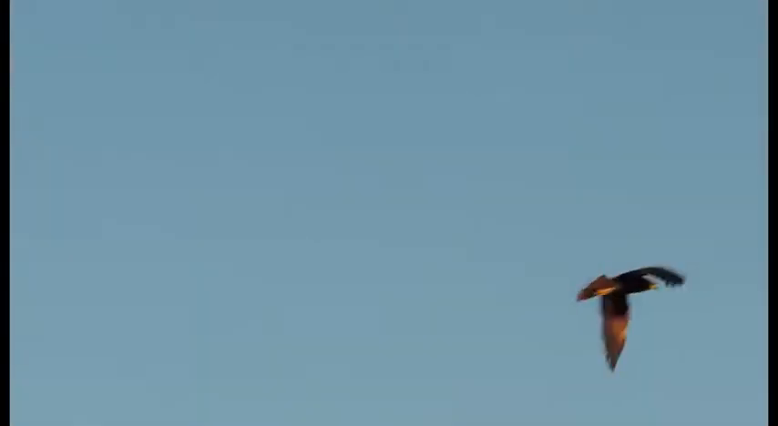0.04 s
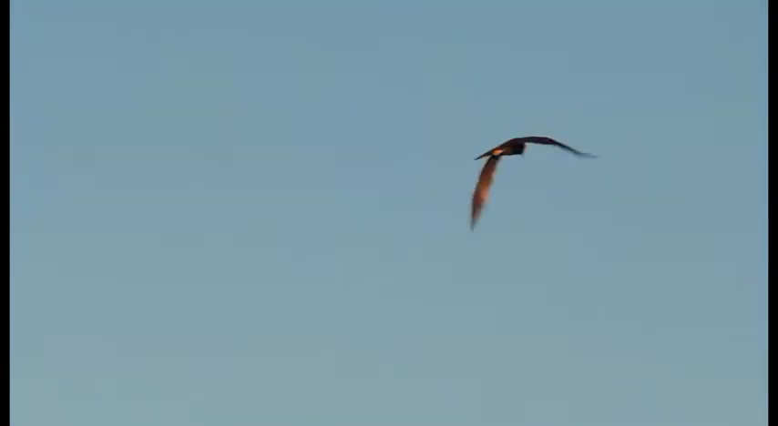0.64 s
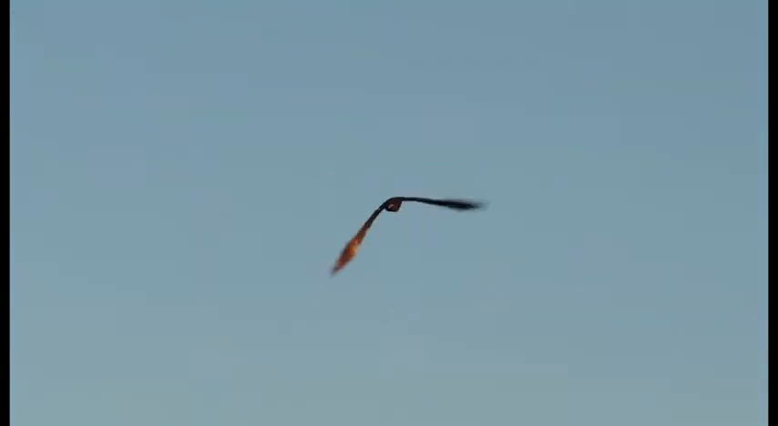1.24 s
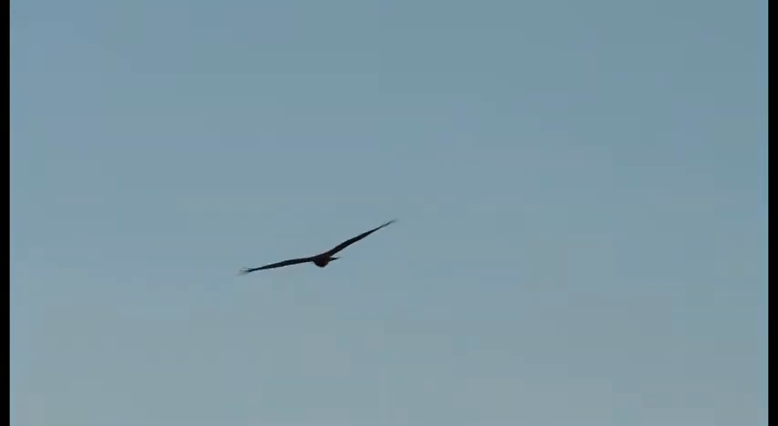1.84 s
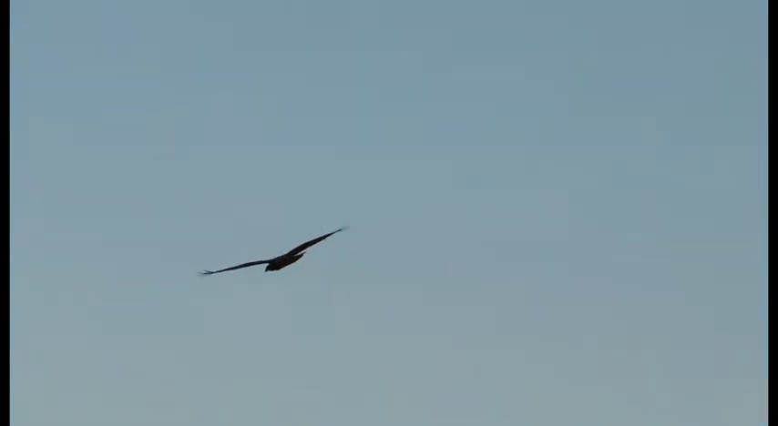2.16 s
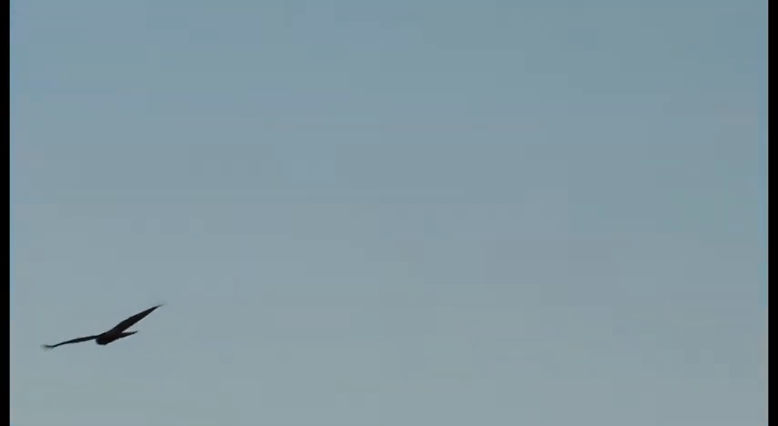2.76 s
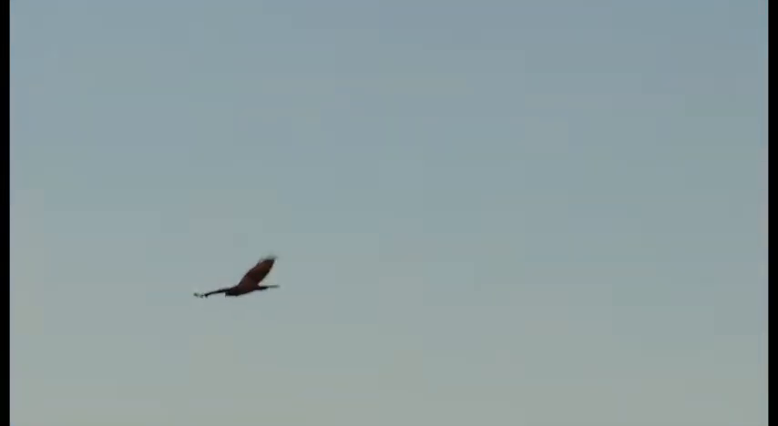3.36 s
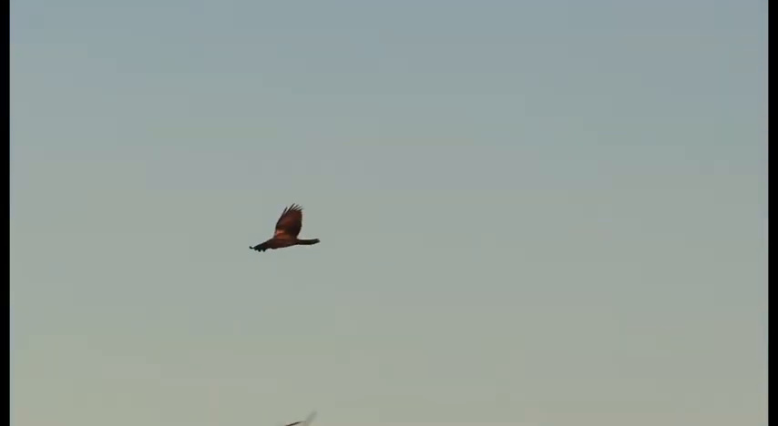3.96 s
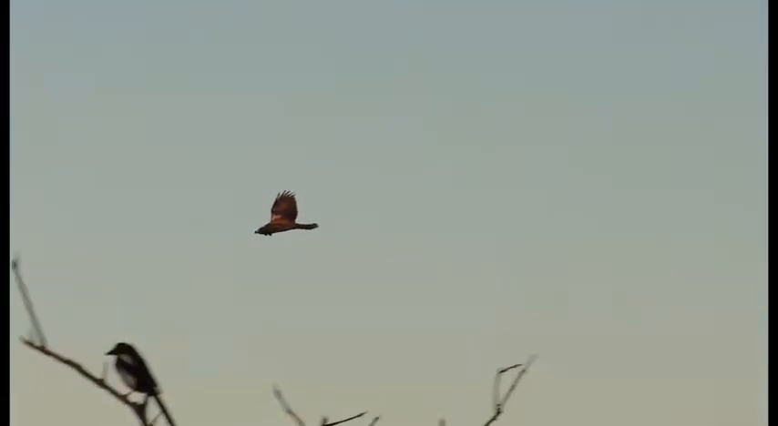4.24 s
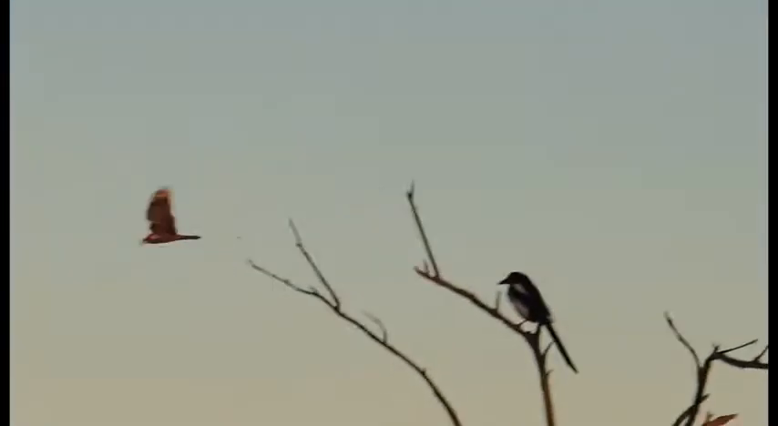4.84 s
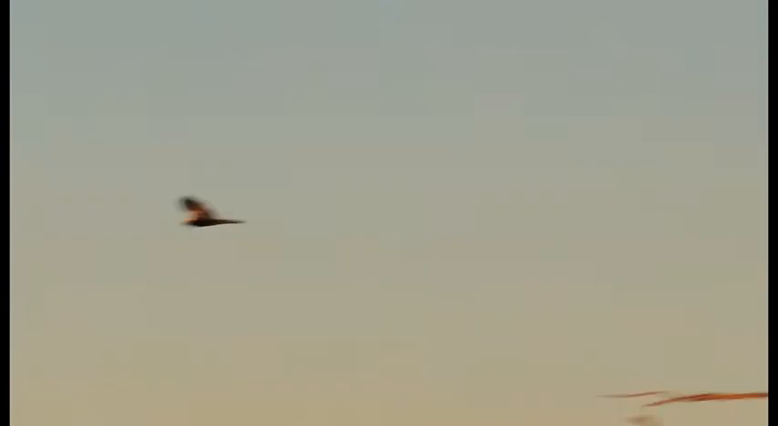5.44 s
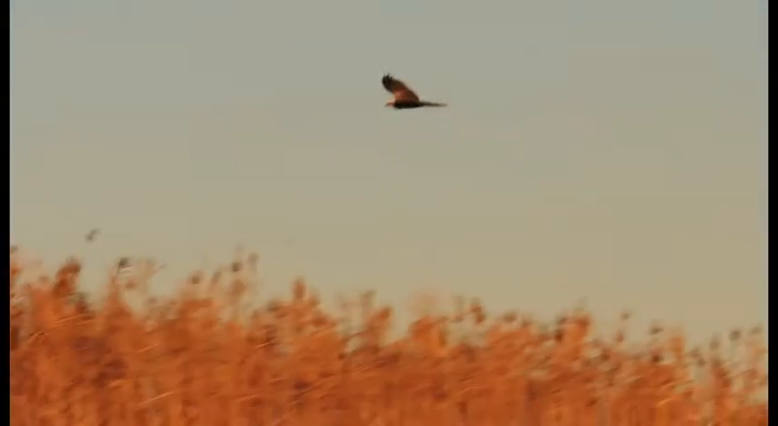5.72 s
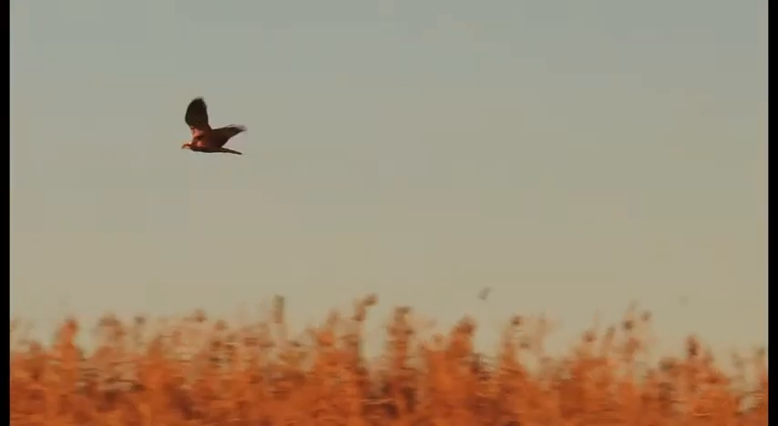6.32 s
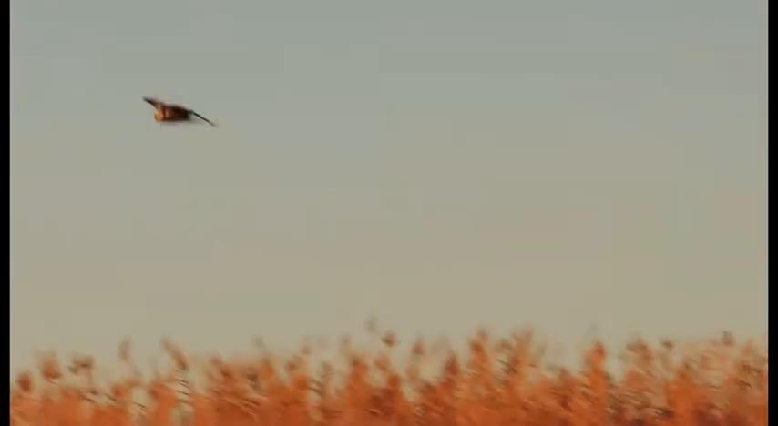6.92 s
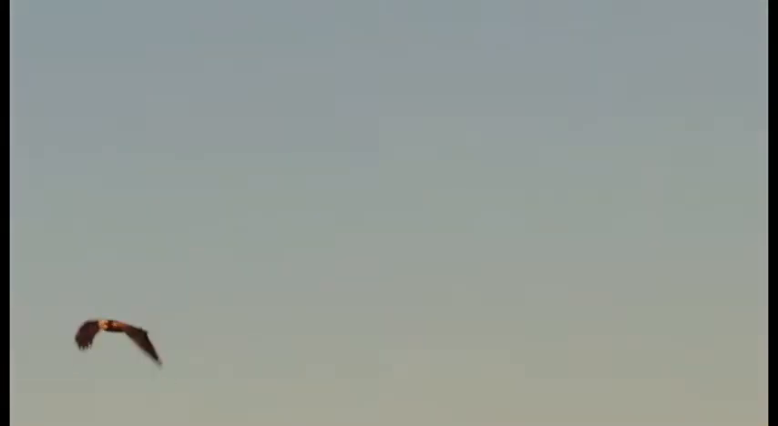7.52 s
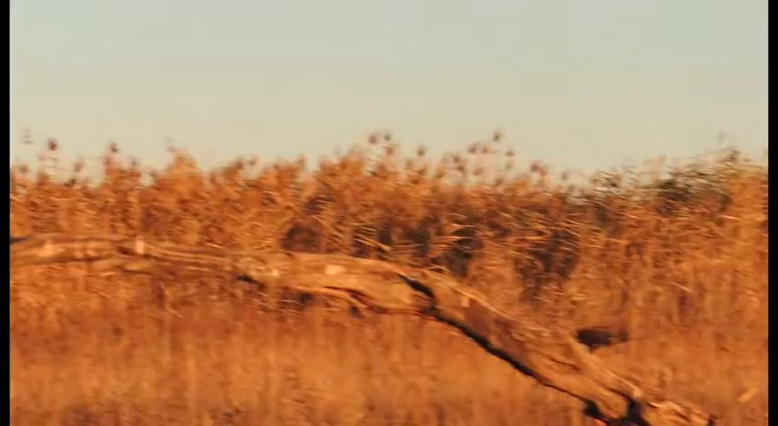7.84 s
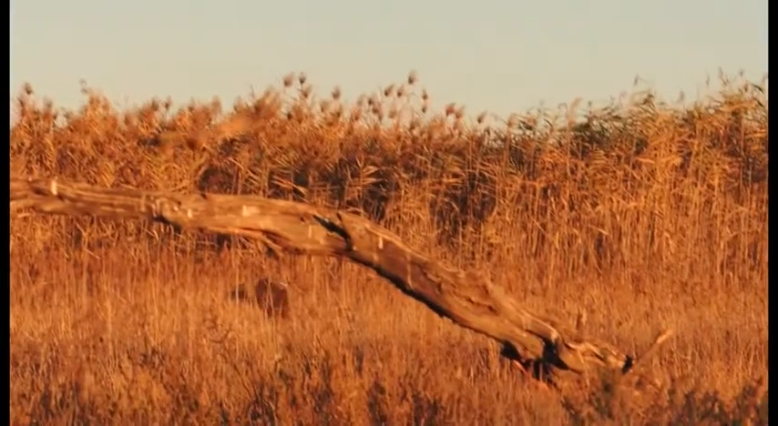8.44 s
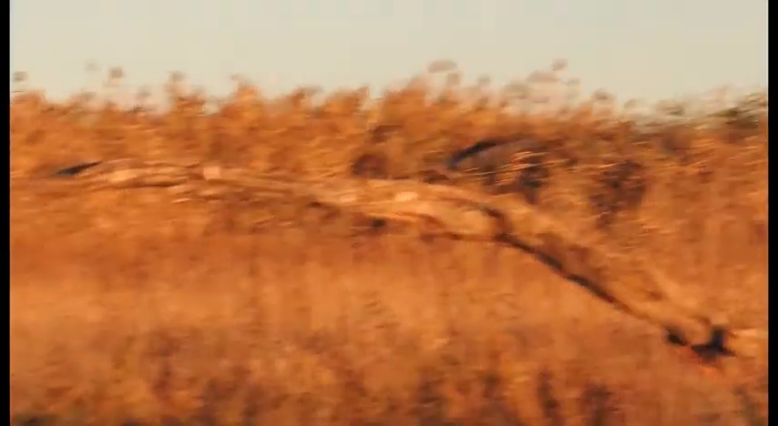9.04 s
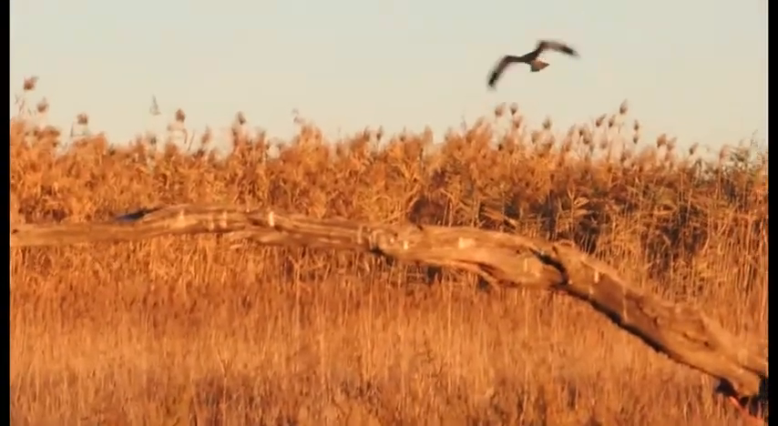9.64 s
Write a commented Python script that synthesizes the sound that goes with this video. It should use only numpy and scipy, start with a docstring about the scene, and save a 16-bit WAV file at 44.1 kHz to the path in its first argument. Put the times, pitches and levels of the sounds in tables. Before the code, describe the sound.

Magpies call in an open wetland, in front of the microphone at different distances. A low, howling wind with a single tick opens the scene, fading under two thin whines. Then harsh chattering, hollow clacking and more distant rasps overlap and alternate in rapid bursts, lightly scattered by the reeds. The scolding thins out into faint reed rustle, far-off gliding whistles, a few trilled whines, two last rasps and a short yelp.

```python
"""Magpies scold over a reed bed. First wind rumbles and howls, with one sharp tick; two trilled whines
sound as it dies. From 1.8 s, in still air, a near bird chatters, a second rattles in short clacks and
a farther one rasps back. After 7.5 s: faint rustle, distant slurs, more whines, a yelp, two last rasps.
Each call is a syrinx whistle roughened by a flapping membrane, shaped by the throat and scattered by
the reeds; the harsh notes also ring in the bill."""
import sys
import numpy as np
from scipy import signal
from scipy.fft import rfft, irfft, next_fast_len
from scipy.io import wavfile

SR = 44100
rng = np.random.default_rng(int(sys.argv[2]) if len(sys.argv) > 2 else 0)


def unload_wav(signal):
    """Save mono or channel-first audio to the path in sys.argv[1] as 16-bit WAV at rate SR, clipped to [-1, 1]."""
    wavfile.write(
        sys.argv[1],
        SR,
        np.round(np.clip(np.atleast_2d(signal).T, -1, 1) * 32767).astype(np.int16),
    )


N = 426447
TIME = np.arange(N) / SR

# Air, reed and wind spectra: freq_hz, gain_db
AIR_SPECTRUM = [(40, 4.5), (500, -19), (5000, -20), (8000, -21), (14000, -23.5)]
RUSTLE_SPECTRUM = [(700, -28), (1500, -5.5), (4800, -3.5), (7000, -26.5)]
RUMBLE_SPECTRUM = [(25, -0.5), (120, -8.5), (570, -14), (2000, -60)]
HOWL_SPECTRUM = [(150, -40.5), (345, -3.5), (385, -1.5), (460, 7.5), (530, -2.5), (620, -30), (770, 2),
                 (850, -1), (920, 8.5), (1030, -12.5), (1300, -8), (2400, -41)]
GUST_SPECTRUM = [(250, -1.5), (750, 12), (1350, 8.5), (1750, 8.5), (2300, -67)]
# Wind envelopes: time_s, level_db
RUMBLE_LEVELS = [(0, -47), (.5, -55), (.8, -52), (1.45, -54.5), (1.8, -62)]
HISS_LEVELS = [(1.3, -55.5), (1.75, -63), (2, -83)]
# Bell-shaped swells: centre_s, half_width_s, level_db
RUSTLE_SWELLS = [(7.65, 0.17, -77), (7.89, 0.038, -69.5), (8.0, 0.099, -72.5), (9.2, 0.71, -73)]
HOWL_SWELLS = [(.85, 0.32, -49), (1.18, 0.1, -48), (1.43, 0.09, -48.5), (1.75, 0.32, -62.5)]
# Throat spectra: freq_hz, gain_db
WHINE_THROAT = [(800, -38), (1650, -6), (3100, 2), (4000, -6.5), (5900, -8.5), (7100, -42)]
RASP_THROAT = [(680, -50.5), (1000, -25.5), (1600, -7.5), (2200, -1), (3300, -4.5), (4100, -1.5),
               (4600, -7.5), (5750, -7), (6400, -27), (7200, -49)]
CLACK_THROAT = [(700, -42.5), (1250, -18.5), (1950, -0.5), (2800, 0.5), (3650, -13), (4400, -17),
                (4900, -14), (5800, -17.5), (6700, -36.5), (7300, -56)]
CHAK_THROAT = [(600, -47), (1200, -27), (1850, -11), (2600, -1.5), (3100, -4.5), (3800, -12), (4500, -13),
               (5900, -11), (6700, -27.5), (7300, -49)]
# Treble change as a head turns: time_s, treble_db
WHINE_FACING = [(1.6, 4.5), (8.102, -9), (8.9, -2), (9.402, -21)]
RASP_FACING = [(4.4, -11), (4.8, -13.5), (5.13, -15), (5.202, -8), (7.398, -9), (8.798, -9.5)]
CLACK_FACING = [(2.799, 13), (4.2, 9), (5.799, 15.5)]
# Distant slurs: start_s, length_s, level_db, first_hz, last_hz
SLURS = [(7.679, 0.19, -72.5, 3690, 4760), (8.483, 0.13, -73.5, 5050, 2910)]
# Trilled whines: start_s, length_s, level_db, first_hz, break_hz, trill_depth_hz, close_extra_db
WHINES = [(1.18, .162, -49.5, 2650, 3750, 240, 5), (1.475, 0.17, -37, 2870, 3172, 200, 0),
          (8.125, 0.12, -48, 2600, 2610, 485, -6), (8.713, 0.1, -47, 2532, 3274, 407, 3.5),
          (8.92, .078, -39, 2687, 2600, 392, 7.5), (9.43, 0.13, -48, 2316, 2530, 485, -3.5),
          (9.649, 0.22, -47, 3130, 3500, 200, 2)]
# Yelp contour: time_s, pitch_hz, level_db, roughness
YELP = [(9.030, 4190, -49.5, 0), (9.047, 4020, -39, 0), (9.053, 2776, -37.5, 0.41),
        (9.062, 2514, -34.5, 0.66), (9.078, 2300, -51.5, 0.7)]
# Farther bird's runs: first_s, last_s, count, level_db, change_db, bill_hz
RASP_RUNS = [(2.486, 2.655, 3, -42, 2, 3900), (2.608, 2.608, 1, -41.5, 0, 3380),
             (3.229, 3.460, 4, -42.5, -3, 3900), (4.069, 4.304, 4, -40, -2.5, 4080),
             (4.861, 5.109, 4, -44, -2, 3130), (5.231, 5.476, 4, -43.5, -4.5, 4270),
             (6.273, 6.504, 4, -42, -2, 4200), (7.144, 7.391, 4, -38.5, -3.5, 4020),
             (8.847, 8.882, 2, -46, -7, 2960)]
# Second bird's runs: first_s, last_s, count, slowing_ratio, level_db, lead_in_extra_db, change_db
CLACK_RUNS = [(1.945, 2.204, 6, 0.04, -37.5, -3, -4.5), (2.779, 2.922, 4, 0.28, -33.5, -3, -4.5),
              (3.658, 3.927, 6, 0.34, -34, -5.5, -6.5), (4.541, 4.754, 5, 0.33, -32, -1, -5.5),
              (5.757, 6.03, 6, .26, -32, -4, -5.5), (6.714, 6.984, 6, 0.16, -31.5, -4, -6)]
# Two notes ahead of each rattle: lead_s
LEAD_IN_S = [.0635, .018]
# Near bird's runs: first_s, last_s, count, level_db, first_extra_db, change_db
CHAK_RUNS = [(1.838, 2.517, 9, -32, -0.5, -3), (2.89, 3.406, 7, -31, -4.5, -5.5),
             (4.522, 4.626, 3, -36, -1.5, 0), (5.201, 5.873, 9, -31.5, -4, -2)]


def amp(db):
    """Decibels to gain."""
    return 10 ** (np.asarray(db) / 20)


def unit(x):
    """Scale to rms 1."""
    return x / np.sqrt(np.mean(x ** 2) + 1e-20)


def colour(x, spectrum):
    """Filter by a spectrum; 12 dB/octave roll-off above its last point."""
    hz, db = np.transpose(spectrum)
    size = next_fast_len(x.shape[-1])
    bins_hz = np.fft.rfftfreq(size, 1 / SR) + 1
    gain = amp(np.interp(np.log(bins_hz), np.log(hz), db)) / np.maximum(bins_hz / hz[-1], 1) ** 2
    return irfft(rfft(x, size) * gain, size)[..., :x.shape[-1]]


def resonate(x, hz, width_hz):
    """Unity-gain resonance; hz may move."""
    carrier = np.exp(2j * np.pi * np.cumsum(hz * np.ones(len(x))) / SR)
    pole = np.exp(-np.pi * width_hz / SR)
    return 2 * (carrier * signal.lfilter([1 - pole], [1, -pole], x / carrier)).real


def wobble(size, hz):
    """Random wavering below hz, rms 1."""
    return unit(signal.sosfilt(signal.butter(2, hz, fs=SR, output="sos"), rng.standard_normal(size)))


def stereo_noise(spectrum, correlation):
    """Coloured noise in two channels, rms 1."""
    left, other = rng.standard_normal((2, N))
    right = correlation * left + np.sqrt(1 - correlation ** 2) * other
    return unit(colour(np.array([left, right]), spectrum))


def swells(rows):
    """Gain curve of summed bells."""
    return sum(amp(db) * np.exp(-((TIME - centre_s) / width_s) ** 2) for centre_s, width_s, db in rows)


def add(mix, start_s, sound):
    """Mix in at start_s."""
    part = mix[round(start_s * SR):][:len(sound)]
    part += sound[:len(part)]


def reeds(x, near_db, near_s, far_db, t60_s):
    """Direct sound, duller scatter from nearby stems and a tail from across the marsh; stereo."""
    t = np.arange(SR) / SR
    taps = rng.choice([-1., 1.], (3, SR)) * (rng.random((3, SR)) < 3000 / SR)
    near, far, wide = colour(taps, [(2500, 0), (4200, -6), (6500, -1)])
    tail = amp(-60 * t / t60_s) * (1 - np.exp(-t / .023))
    stems = amp(near_db) * unit(near * np.exp(-t / near_s) * (t > .003))
    mid = stems + amp(far_db) * unit(far * tail)
    side = amp(-38) * unit(wide * tail)
    response = np.array([mid + side, mid - side]) / np.sqrt(SR)
    return x + signal.fftconvolve(x[None], response, axes=1)[:, :N]


def marsh():
    """Still air, a faint hum and a thin ring fade in as the wind drops; reeds rustle later."""
    hum = amp(-92.5) * np.sqrt(2) * np.sin(2 * np.pi * 100 * TIME)
    ring = amp(-86) * unit(resonate(rng.standard_normal(N), hz=3260, width_hz=110))
    air = amp(-83) * stereo_noise(AIR_SPECTRUM, correlation=.63)
    rustle = stereo_noise(RUSTLE_SPECTRUM, correlation=1) * swells(RUSTLE_SWELLS)
    rustle *= amp(3 * wobble(N, hz=130))
    return (air + hum + ring) * np.interp(TIME, [1.1, 1.6], [0, 1]) + rustle


def wind():
    """Lumpy rumble, surging two-note howl, one brighter gust and fine hiss; all gone by 2 s."""
    rumble = stereo_noise(RUMBLE_SPECTRUM, correlation=.54)
    rumble *= amp(np.interp(TIME, *np.transpose(RUMBLE_LEVELS)) + 1.1 * wobble(N, hz=24))
    howl = stereo_noise(HOWL_SPECTRUM, correlation=.82) * swells(HOWL_SWELLS)
    howl *= amp(1.4 * wobble(N, hz=25))
    gust = stereo_noise(GUST_SPECTRUM, correlation=.72) * swells([(.85, .08, -48)])
    hiss = stereo_noise([(2000, 9.5), (7100, 3.5), (7450, -67.5)], correlation=.048)
    hiss *= amp(np.interp(TIME, *np.transpose(HISS_LEVELS)))
    lean_right = amp([[-1.4], [1.3]])
    fade = np.interp(TIME, [1.8, 2], [1, 0]) ** 2
    return fade * ((rumble + howl + gust) * lean_right + hiss)


def ticks():
    """One sharp two-pulse tick; a faint one much later."""
    out = np.zeros(N)
    t = np.arange(-.001, .004, 1 / SR)
    for peak_s, db, hz in [(.5407, -22, 5900), (.5411, -20.5, 3740), (7.917, -50.5, 3440)]:
        add(out, peak_s + t[0], amp(db) * np.exp(-(t / .00029) ** 2) * np.sin(2 * np.pi * hz * t))
    return reeds(out, near_db=-9.5, near_s=.018, far_db=-35.5, t60_s=.3)


def syrinx(hz, rough, flap_hz, jitter, octave_db=-8):
    """Whistle; a flapping membrane shakes its pitch and adds a lower side tone. Rough 1: only puffs."""
    size, rough = len(hz), np.clip(rough, 0, 1)
    flaps = np.cumsum(flap_hz * (1 + .25 * rough * wobble(size, hz=500))) / SR
    cycles = np.cumsum(hz * (1 + jitter * rough * wobble(size, hz=886))) / SR
    tone = np.exp(2j * np.pi * cycles) + amp(octave_db) * np.exp(4j * np.pi * cycles)
    whistle = (tone * (1 + np.cbrt(rough / 2) * np.exp(-2j * np.pi * flaps))).real
    puffs = rng.standard_normal(size) * (.38 + np.exp(-(flaps % 1) / .19))
    return (1 - rough ** 2) * unit(whistle) + 2 * rough ** 2 * unit(puffs)


def turned(throat, facing, time_s):
    """Throat spectrum as heard: treble beams from the bill and fades as it turns away."""
    treble_db = np.interp(time_s, *np.transpose(facing))
    return [(hz, db + np.interp(hz, [3000, 4500], [0, treble_db])) for hz, db in throat]


def distant_slurs():
    """Hoarse gliding whistles from far across the marsh."""
    out = np.zeros(N)
    for start_s, length_s, db, first_hz, last_hz in SLURS:
        hz = np.linspace(first_hz, last_hz, round(length_s * SR))
        voice = colour(syrinx(hz, rough=.35, flap_hz=605, jitter=.15, octave_db=-26), RUSTLE_SPECTRUM)
        add(out, start_s, amp(db) * unit(voice) * signal.windows.tukey(len(hz), .5))
    return reeds(out, near_db=-9, near_s=.027, far_db=-5.5, t60_s=.41)


def yelp():
    """Thin whistle that breaks downward. Returns start_s, sound."""
    times_s, *columns = np.transpose(YELP)
    t = np.arange(times_s[0], times_s[-1], 1 / SR)
    hz, db, rough = (np.interp(t, times_s, column) for column in columns)
    voice = syrinx(hz, rough, flap_hz=571, jitter=.217)
    voice = colour(voice, turned(WHINE_THROAT, WHINE_FACING, t[0]))
    return t[0], amp(db) * unit(voice) * signal.windows.tukey(len(t), .1)


def whines():
    """Trilled whistles swell, mostly rising, then break to a hoarse close; one yelp among them."""
    trill_hz, rough_per_hz = 87, .0011
    close_s, break_s, close_hz, close_rough = .04, .014, 2550, .55
    out = np.zeros(N)
    for start_s, length_s, db, first_hz, break_hz, depth_hz, close_db in WHINES:
        t = np.arange(0, length_s, 1 / SR)
        break_span_s = [length_s - close_s, length_s - close_s + break_s]
        broken = np.interp(t, break_span_s, [0, 1])
        rough = np.interp(t, break_span_s, [rough_per_hz * depth_hz, close_rough])
        rate_hz = trill_hz * (1 + .7 * rough * wobble(len(t), hz=70))
        trill = np.sin(2 * np.pi * np.cumsum(rate_hz) / SR)
        hz = np.interp(t, [0, *break_span_s], [first_hz, break_hz, close_hz]) + depth_hz * trill
        voice = syrinx(hz, rough, flap_hz=.27 * hz, jitter=.17)
        voice = colour(voice, turned(WHINE_THROAT, WHINE_FACING, start_s))
        swell = np.interp(t, [0, *break_span_s, length_s], [0, 1, 1, 0]) ** np.where(broken, 1, .55)
        flutter_db = 4 * rough * wobble(len(t), hz=90)
        add(out, start_s, amp(db + close_db * broken + flutter_db) * swell * unit(voice))
    add(out, *yelp())
    return reeds(out, near_db=-14, near_s=.018, far_db=-25, t60_s=.5)


def harsh_note(peak_s, db, hz, throat, rise_s, onset_db, decay_s,
               voicing, flap_hz, jitter, bill_db, bill_hz, droop):
    """Pressure swells until the voice catches at peak_s, then collapses. Returns start_s, sound."""
    opening_share, arch_lead_s, climb_s, fall_s = .4, .008, .017, .012
    t = np.arange(-rise_s, 6 * decay_s, 1 / SR)
    opening = np.minimum((1 + t / rise_s) / opening_share, 1)
    swell = amp(onset_db * (np.minimum(t, 0) / rise_s) ** 2)
    pressure = opening * swell / np.cosh(np.maximum(t, 0) / decay_s)
    # Pitch and bill resonance arch up, then flick down by the share droop.
    past_top_s = t + arch_lead_s
    arch = 1 - droop * np.tanh((past_top_s / np.where(past_top_s < 0, climb_s, fall_s)) ** 2)
    rough = .96 - voicing * pressure
    voice = colour(syrinx(hz * arch, rough, flap_hz, jitter), throat)
    bill = amp(bill_db) * resonate(voice, bill_hz * arch, width_hz=560)
    return peak_s + t[0], amp(db) * pressure * unit(voice + bill)


def run(first_s, last_s, count, db, change_db, slowing, power):
    """Note times_s, levels_db. Gaps lengthen as the bird tires; the higher the power, the later."""
    gaps = 1 + slowing * np.linspace(0, 1, count - 1) ** power
    beats = np.append(0, np.cumsum(gaps))
    times_s = first_s + (last_s - first_s) * beats / max(beats[-1], 1)
    return times_s, db + change_db * np.linspace(0, 1, count)


def rasps():
    """Farther bird: long toneless rasps that start abruptly and ring in the bill."""
    out = np.zeros(N)
    for first_s, last_s, count, run_db, change_db, bill_hz in RASP_RUNS:
        for peak_s, db in zip(*run(first_s, last_s, count, run_db, change_db, slowing=.28, power=.5)):
            add(out, *harsh_note(
                peak_s, db, hz=2365, throat=turned(RASP_THROAT, RASP_FACING, peak_s),
                rise_s=.037, onset_db=-6, decay_s=.012,
                voicing=0, flap_hz=380, jitter=.22, bill_db=6, bill_hz=bill_hz, droop=0))
    return reeds(out, near_db=-9, near_s=.025, far_db=-12.5, t60_s=.42)


def clack_notes():
    """Squeaky lead-ins, toneless clacks, weaker afterbeats: peak_s, level_db, pitch_hz, voicing."""
    lead_in_hz, first_hz, sink_share, squeak_voicing = 2970, 2600, .23, .2
    after_s, after_db, after_change_db = .028, -4, -8.5
    notes = []
    for first_s, last_s, count, slowing, db, lead_db, change_db in CLACK_RUNS:
        times_s, levels_db = run(first_s, last_s, count, db, change_db, slowing, power=2)
        progress = np.linspace(0, 1, count)
        pitches_hz = first_hz * (1 - sink_share * progress)
        afterbeats_db = levels_db + after_db + after_change_db * progress
        notes += [(first_s - lead_s, db + lead_db, lead_in_hz, squeak_voicing) for lead_s in LEAD_IN_S]
        notes += zip(times_s, levels_db, pitches_hz, np.zeros(count))
        notes += zip(times_s[:-1] + after_s, afterbeats_db, pitches_hz, squeak_voicing * (1 - progress))
    return notes


def rattle():
    """Second bird: dry, hollow clacks that weaken, shorten, slow and sink over each run."""
    out = np.zeros(N)
    for peak_s, db, hz, voicing in clack_notes():
        add(out, *harsh_note(
            peak_s, db, hz, throat=turned(CLACK_THROAT, CLACK_FACING, peak_s),
            rise_s=.0125 * amp(.65 * (db + 37)), onset_db=-16.5, decay_s=.0056,
            voicing=voicing, flap_hz=788, jitter=.15, bill_db=2, bill_hz=hz, droop=.22))
    return reeds(out, near_db=-10, near_s=.022, far_db=-17.5, t60_s=.56)


def chatter():
    """Near bird: half-voiced chaks, about 12 a second, varied in pitch and tone; soft ones are shorter."""
    out = np.zeros(N)
    for first_s, last_s, count, run_db, first_extra_db, change_db in CHAK_RUNS:
        times_s, levels_db = run(first_s, last_s, count, run_db, change_db, slowing=.18, power=3)
        levels_db[0] += first_extra_db
        for peak_s, db in zip(times_s, levels_db):
            high, clear, steep = rng.uniform(-.997, 1, 3)
            hz = 3130 + 130 * high
            add(out, *harsh_note(
                peak_s, db, hz, throat=CHAK_THROAT,
                rise_s=.034 * amp(.4 * (db + 33.5)), onset_db=-13.5, decay_s=.0054,
                voicing=.215 * (1 + clear / 2), flap_hz=680, jitter=.17,
                bill_db=-1.5, bill_hz=hz, droop=.28 * (1 + steep / 4)))
    return reeds(out, near_db=-14, near_s=.024, far_db=-18.5, t60_s=.36)


def scene():
    """Birds straight ahead, air all round."""
    return chatter() + rattle() + rasps() + whines() + distant_slurs() + wind() + ticks() + marsh()


def record(dry):
    """Steep low-pass at 15.1 kHz."""
    lowpass = signal.firwin(511, 15100, window=("kaiser", 9), fs=SR)
    return signal.oaconvolve(dry, lowpass[None], "same")


dry = scene()
out = record(dry)
unload_wav(out)
```